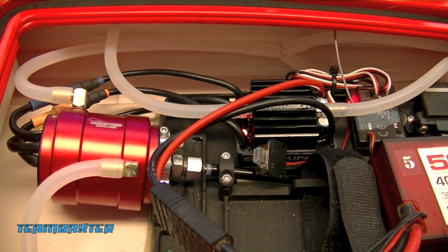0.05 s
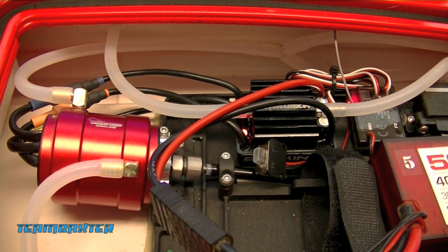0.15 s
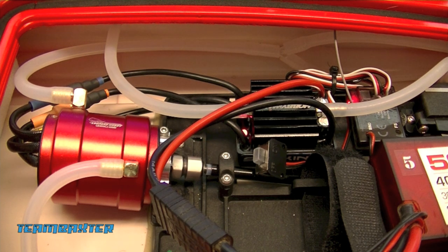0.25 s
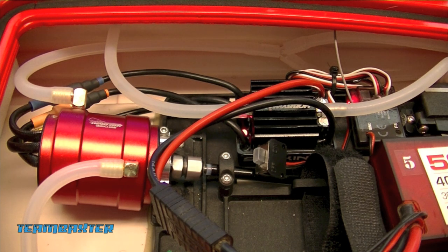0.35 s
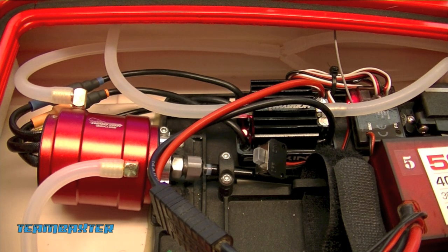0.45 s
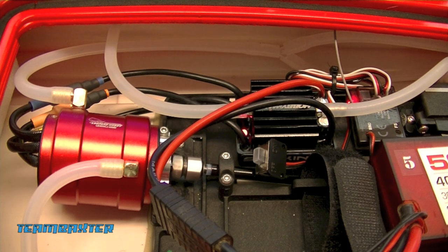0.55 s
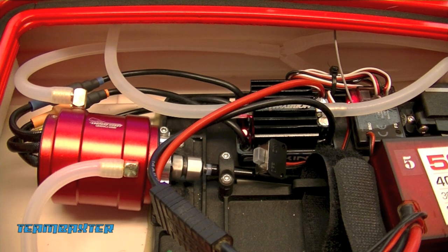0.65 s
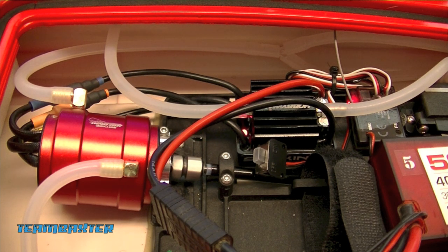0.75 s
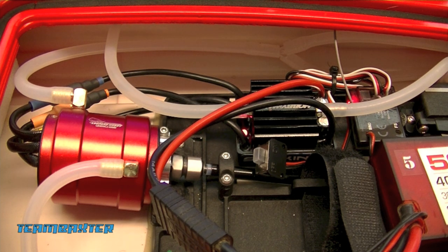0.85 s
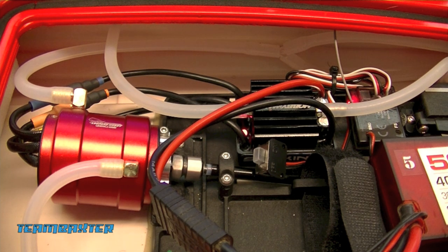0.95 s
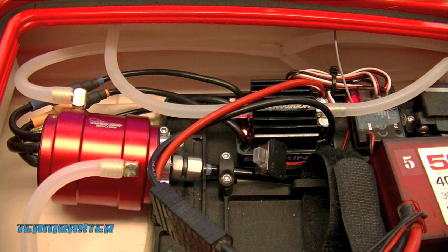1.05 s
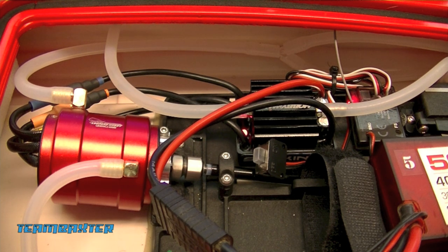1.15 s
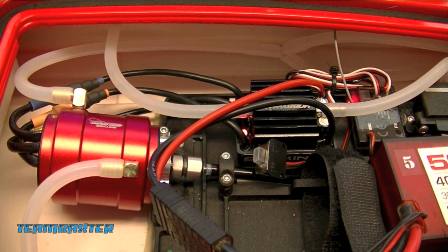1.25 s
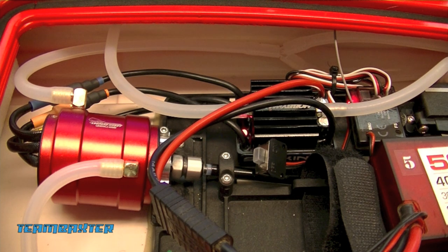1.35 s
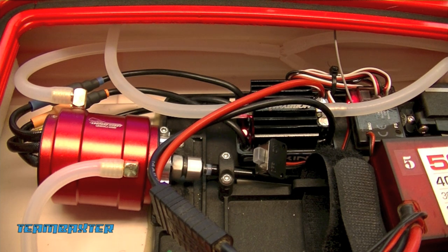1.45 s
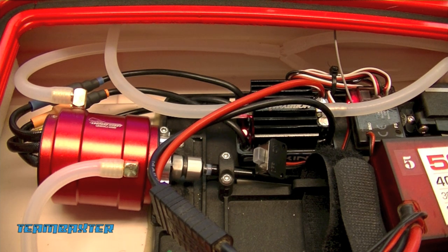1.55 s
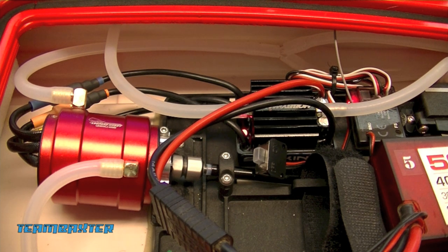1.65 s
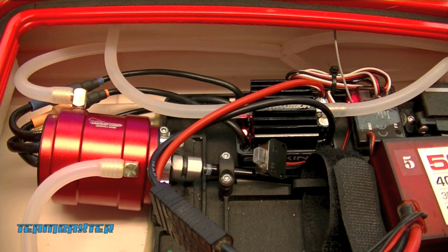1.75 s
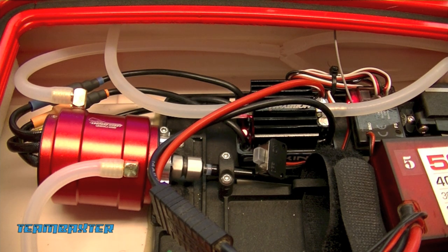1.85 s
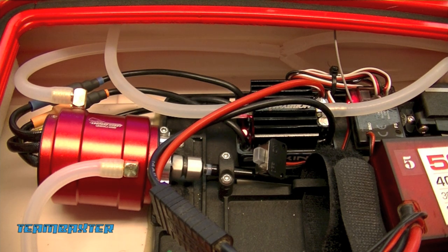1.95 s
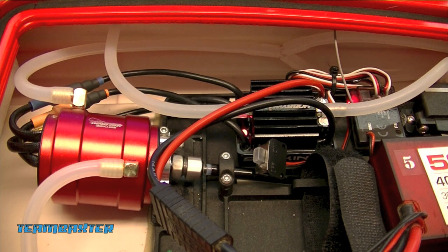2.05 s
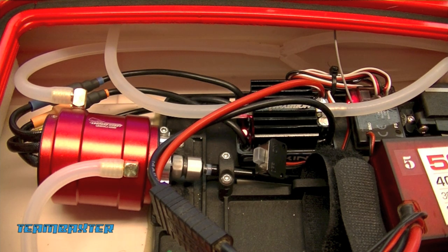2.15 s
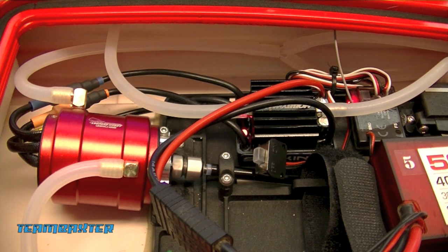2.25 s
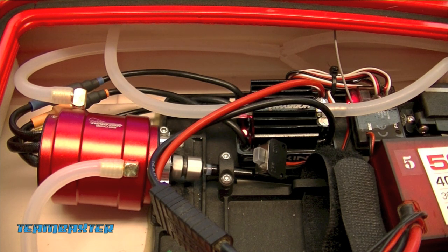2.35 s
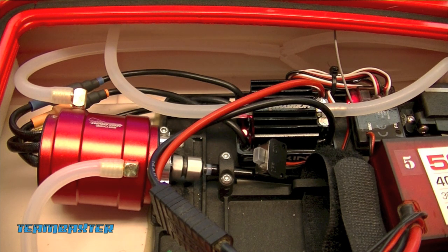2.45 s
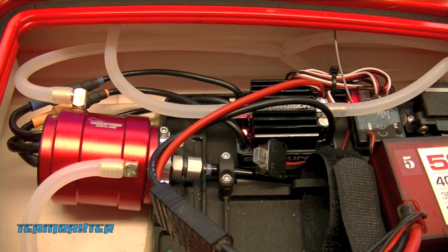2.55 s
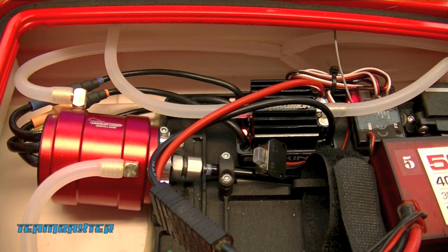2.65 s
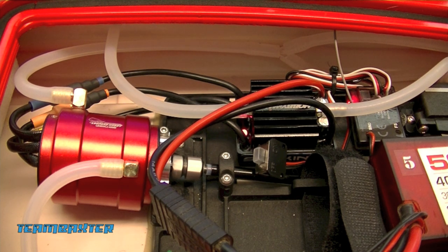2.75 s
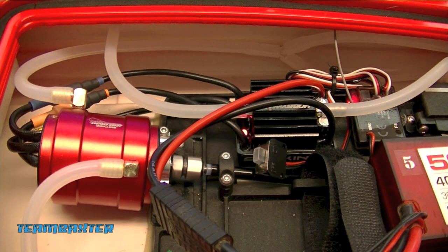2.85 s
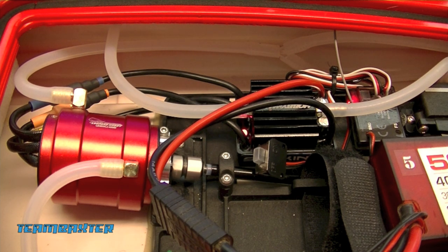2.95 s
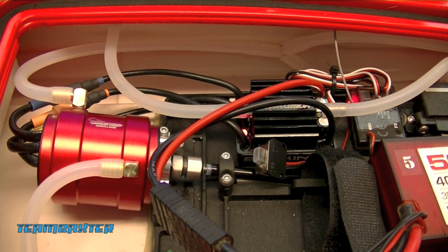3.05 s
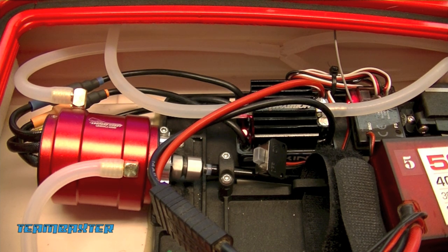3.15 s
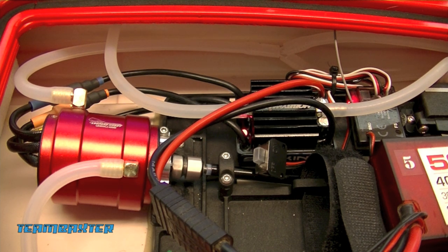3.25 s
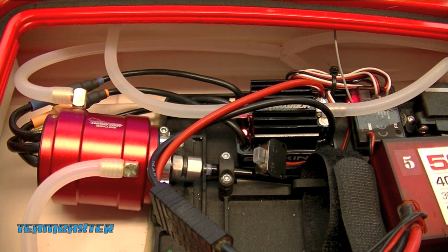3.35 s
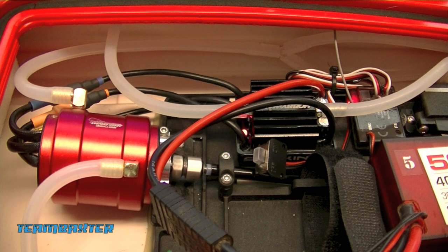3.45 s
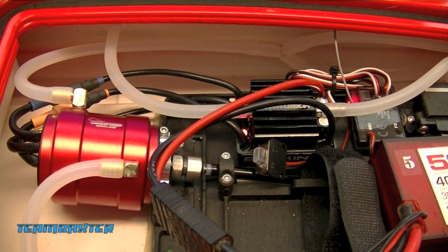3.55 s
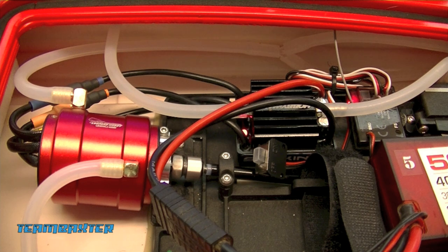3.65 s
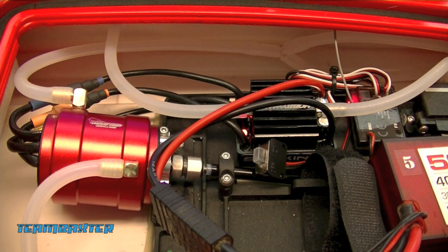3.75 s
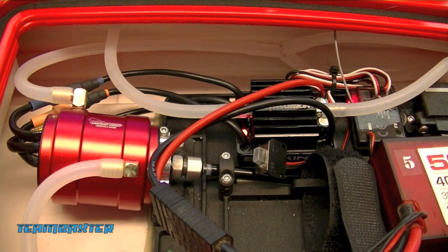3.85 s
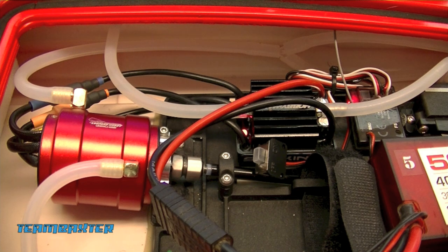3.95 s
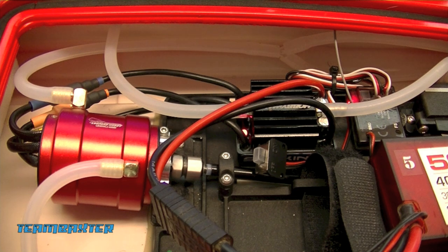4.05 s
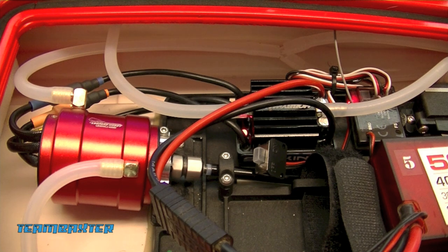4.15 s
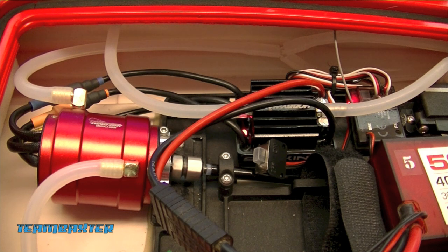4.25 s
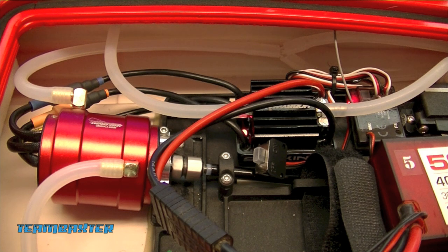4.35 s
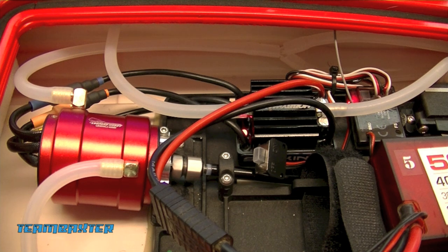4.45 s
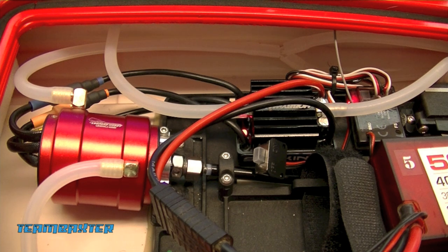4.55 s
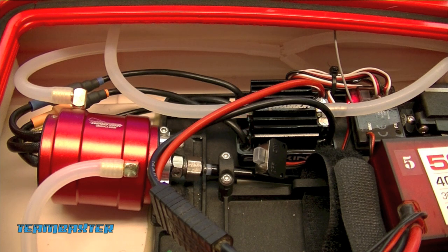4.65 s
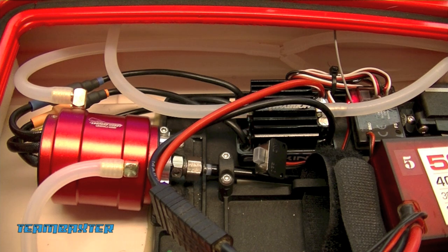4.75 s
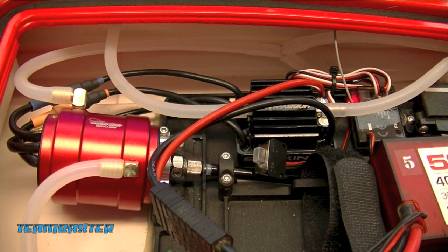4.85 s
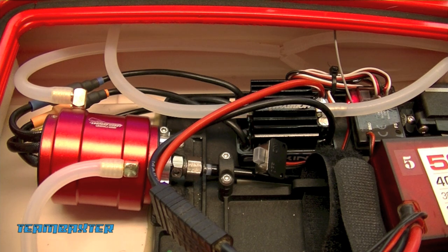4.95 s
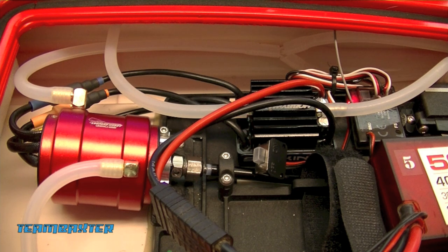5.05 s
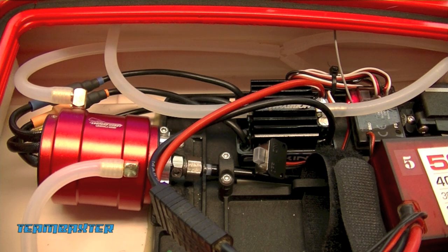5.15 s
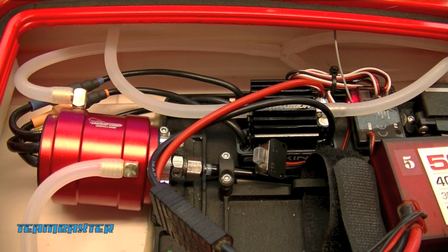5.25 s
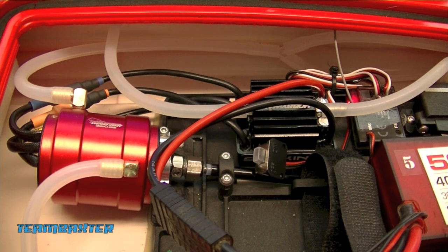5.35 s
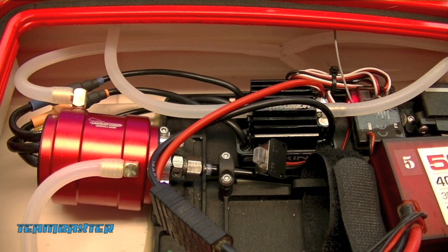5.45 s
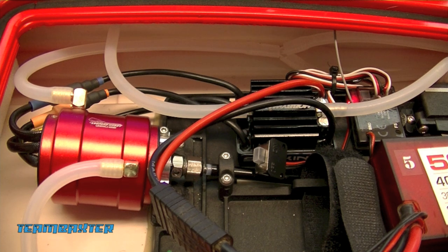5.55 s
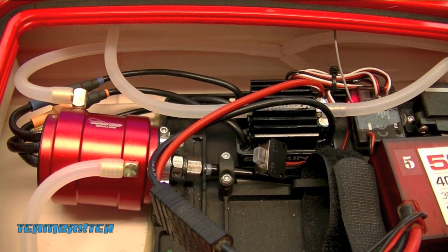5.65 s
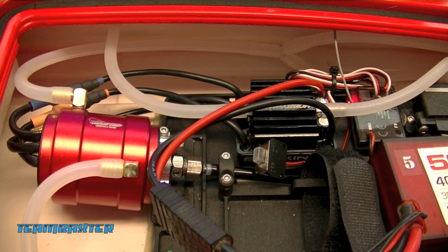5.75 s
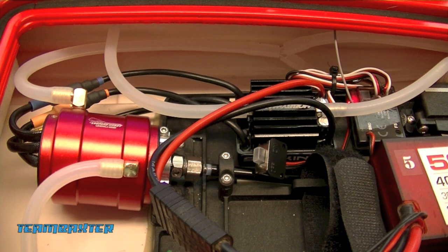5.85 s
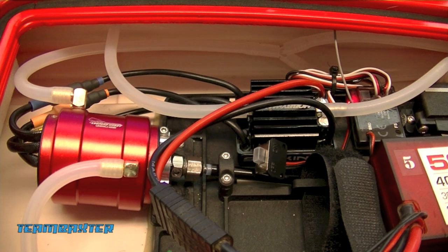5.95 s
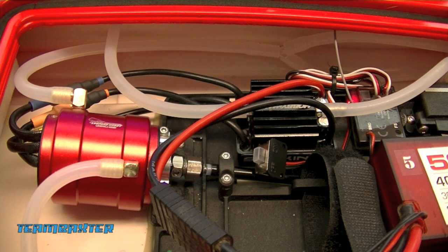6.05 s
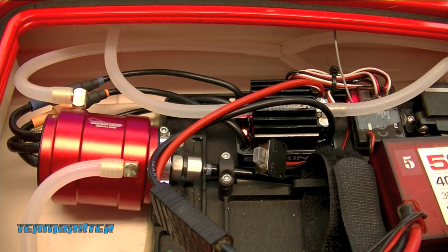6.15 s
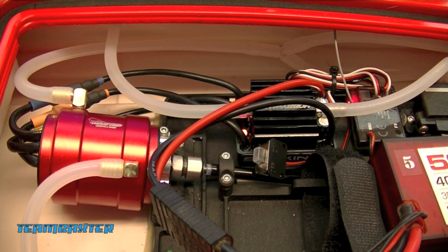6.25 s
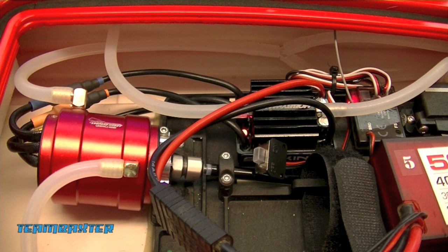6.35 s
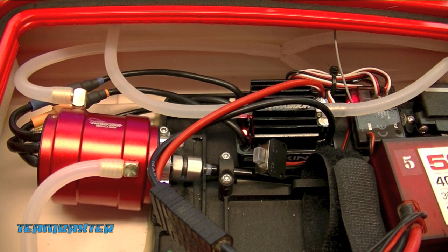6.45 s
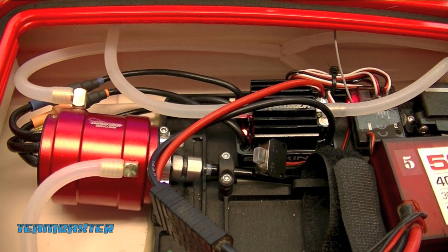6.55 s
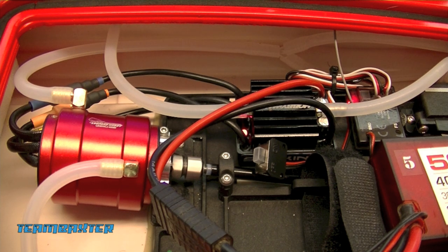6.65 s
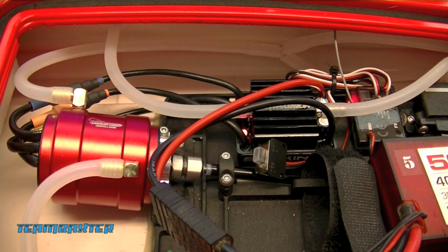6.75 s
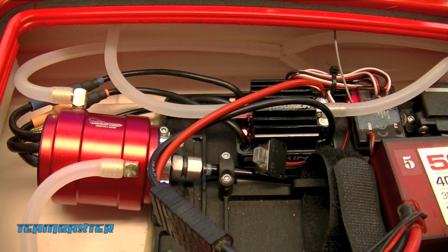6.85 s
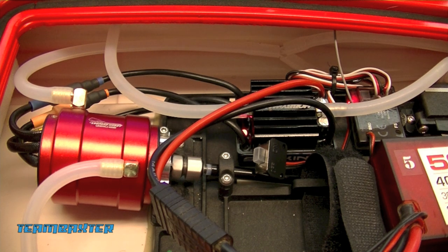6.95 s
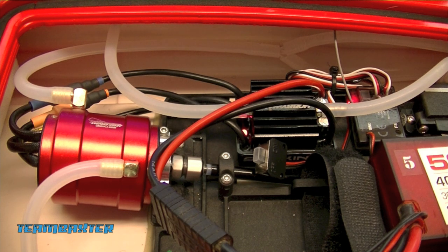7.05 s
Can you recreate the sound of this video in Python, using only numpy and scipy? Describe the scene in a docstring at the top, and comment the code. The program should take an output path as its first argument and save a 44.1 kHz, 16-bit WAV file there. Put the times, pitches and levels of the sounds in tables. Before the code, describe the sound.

A small electric motor drives a model boat's shaft at low speed, heard close in a room with a faint steady hum. From the start, a thin, very high whine stutters while the loose drive rattles hollowly against the hull. Around 0.7 seconds the motor catches with sharp metallic clacks and a short grind. The clatter continues, and the whine breaks briefly a few more times until 1.5 seconds. At about 2.6 seconds the rattle drops away, leaving the even whine over a low hum, soft bearing rub and rapid light ticking. The motor stops quickly at 4.6 seconds. A light tap comes near 4.9 seconds and a fainter one near 5.3. At about 6.1 seconds the motor restarts with a short burst of extra speed, then keeps whining, rattling and clacking until the end, just after 7 seconds.

```python
"""An 8 kHz whine stutters over a rattling hull: a brushless motor turns a model boat's drive shaft at
light throttle, out of the water, close by. The controller's switching makes the whine; torque steps knock
the loose drive against the hull and the coupling clacks across its play. The motor settles into a
torque-ripple hum with bearing rub and one tick a turn, then stops. Two light taps follow, and it restarts
with a short overshoot. A faint steady hum fills the room."""
import sys
import numpy as np
from scipy import signal
from scipy.fft import rfft, irfft, next_fast_len
from scipy.io import wavfile
from scipy.ndimage import map_coordinates

SR = 44100
rng = np.random.default_rng(int(sys.argv[2]) if len(sys.argv) > 2 else 0)


def generate_wav(signal):
    """Clip the signal to [-1, 1] and save it as 16-bit WAV at the path in sys.argv[1]."""
    frames = np.transpose(np.atleast_2d(signal))
    scaled = np.clip(frames, -1, 1) * 32767
    pcm = np.round(scaled).astype(np.int16)
    wavfile.write(sys.argv[1], SR, pcm)


N = 312757

# throttle: open_s, close_s, tight_spot_s (a moment when the coupling passes it)
RUNS = [(-.1, 4.595, 3.6186), (6.142, 7.2, 6.9675)]
# motor speed: time_s, commutation_hz
SPEED = [(.55, 185), (.7, 212), (1.45, 210), (1.7, 223), (2.42, 230), (2.52, 233), (2.6, 239.5),
         (3.1, 242.3), (4.2, 248.4), (4.6, 250), (4.75, 240), (6.15, 370), (6.25, 340), (6.33, 323),
         (6.355, 241), (6.45, 237), (6.5, 244), (6.62, 239), (6.8, 237.5), (6.86, 251), (7.09, 258)]
# controller loses step and cuts the current: start_s, end_s, depth_db
STUTTERS = [(.009, .029, 22), (.049, .056, 16), (.07, .078, 14.5), (.118, .136, 12.5), (.146, .155, 27),
            (.155, .17, 7.5), (.217, .234, 26.5), (.247, .256, 25.5), (.353, .368, 28), (.376, .402, 16),
            (.416, .425, 21.5), (.47, .489, 14.5), (.501, .506, 17), (.538, .559, 17.5), (.568, .581, 23),
            (.596, .601, 24.5), (1.146, 1.161, 17.5), (1.177, 1.182, 13), (1.307, 1.32, 19.5),
            (1.326, 1.334, 13.5), (1.35, 1.355, 10), (1.455, 1.469, 21.5), (1.48, 1.487, 20)]
# drive floats in its play and falls quiet: start_s, end_s, depth_db
LULLS = [(0.01, 0.034, 14), (0.041, 0.057, 13.5), (0.069, 0.07, 18.5), (0.144, 0.172, 10),
         (0.226, 0.259, 9.5), (0.362, 0.375, 6.5), (0.381, 0.403, 16.5), (0.411, 0.418, 16),
         (0.474, 0.502, 7), (0.547, 0.562, 8), (0.575, 0.583, 14), (0.595, 0.605, 7.5), (1.164, 1.18, 6),
         (1.466, 1.486, 9.5)]
# uneven poles swing the whine: shaft_order, depth
POLE_SWING = [(4, 0.071), (8, 0.09), (10, 0.094), (12, 0.031)]
# rotor tones: shaft_order, relative_db
ROTOR_ORDERS = [(6, -34), (9, -29), (10, -25), (13, -17), (16, -9), (17, -13.5), (18, -8.5), (23, -19),
                (25, -18), (27, -19), (29, -21), (30, -14.5), (32, -19.5), (36, -14.5), (37, -17),
                (39, -21), (48, -16.5), (49, -20), (50, -21.5), (58, -21.5), (60, -23.5)]
# mount resonances: centre_hz, width_hz, lift_db
MOUNT_MODES = [(248.5, 15, 9), (327, 48, 22), (472.2, 19.4, 6.5)]
# hull and, higher up, motor housing resonances: centre_hz, width_hz, lift_db
HULL_MODES = [(117, 19, 10.5), (160, 15, -5.5), (193, 21, 7.5), (205.2, 16, 6), (323.3, 19, 11.5),
              (374.7, 54.6, 10.5), (468.3, 46, 10), (559.7, 35, 8.5), (659, 14, 1.5), (830, 60, 8.5),
              (1066, 85, 8.5), (1198, 24, 5.5), (1430, 140, 9), (1570, 103, 9.5), (1758, 64, 7),
              (1950, 79, 4.5), (2160, 190, 0.5), (2593, 26, 7.5), (2810, 56, 3), (3013, 90, 4.5),
              (3560, 150, 6.5), (3800, 100, 5.5), (4324, 76, 7), (4515, 68, 3), (4810, 80, 5),
              (5390, 95, 5), (5880, 63, 5), (9200, 230, -1)]
# play in the drive train: time_s, rattle_db
RATTLE_LEVEL = [(0, -23), (.55, -23.5), (.9, -27.5), (1.25, -21.5), (1.6, -28), (2.4, -29), (2.45, -34),
                (2.51, -29.5), (2.63, -50.5), (3.7, -49.5), (4.6, -43), (6.24, -28), (6.32, -35.5),
                (6.37, -27.5), (6.45, -27), (6.52, -33), (6.62, -27.5), (6.79, -26), (6.85, -37),
                (7.09, -34.5)]
# shaft rasps in its bearing: middle_s, length_s, lift_db
RASPS = [(2.505, 0.029, 8), (3.414, 0.034, 4), (4.595, 0.0098, 4.5)]
# steady room hum: pitch_hz, level_db
ROOM_TONES = [(172.3, -60), (290.7, -58.5), (409.1, -52.5), (468.3, -67.5), (527.6, -63.5), (995.9, -67.5),
              (1055, -69), (1696, -70), (1992, -77), (2116, -76.5), (3149, -73.5), (4506, -72.5),
              (4678, -75), (5033, -82.5)]
# hard snaps of the coupling: time_s, clack_relative_db, thump_relative_db
HARD_SNAPS = [(.06, -25, -11.5), (.082, -21, -7.5), (.251, -19, -9.5), (.335, -17.5, -17), (.424, -38, -10),
              (.621, -24, -7.5), (.667, -3.5, -24), (.677, -9.5, -12), (.711, -4.5, -9), (.726, -12, -6.5),
              (.775, -20, -23), (.784, -10.5, -24), (.833, -21, -32), (.866, -14, -26), (.884, -15, -13),
              (.902, -25, -11.5), (.929, -21, -13), (.984, -14, -26), (1.057, -13, -10),
              (1.145, -17.5, -22), (1.219, -15, -10), (1.314, -25, -9.5), (1.355, -28, -2.5),
              (1.364, -17.5, -21), (1.409, -21.5, -18), (1.449, -18.5, -15), (1.459, -32, -4),
              (1.536, -19, -17), (1.564, -18, -8.5), (1.584, -33, -14), (1.623, -34, -24),
              (1.666, -24, -12), (1.704, -28, -13), (1.733, -27, -13), (1.761, -31, -13.5),
              (1.787, -33, -11.5), (1.814, -41, -18), (1.86, -28, -12), (1.886, -25, -12),
              (1.926, -28, -19), (1.951, -34, -10), (1.977, -31, -11), (2.003, -24, -19),
              (2.048, -26.5, -12.5), (2.101, -25, -13.5), (2.137, -23.5, -11.5), (2.162, -28, -12),
              (2.216, -20.5, -13.5), (2.247, -32, -13), (2.271, -22.5, -15), (2.298, -25.5, -10),
              (2.354, -24, -22), (2.378, -22.5, -16), (2.404, -21, -14.5), (2.477, -21.5, -27),
              (2.63, -28, -33), (3.422, -26.5, -30), (4.597, -31, -15), (6.148, -32, -22),
              (6.197, -29, -18), (6.235, -17, -18), (6.264, -15, -35), (6.3, -17, -35), (6.345, -22, -21),
              (6.374, -28.5, -11.5), (6.422, -27, -13), (6.44, -16.5, -11.5), (6.525, -19, -22),
              (6.541, -19, -31), (6.572, -19, -28), (6.592, -25, -11), (6.647, -24, -12.5),
              (6.675, -25, -15), (6.691, -19, -29), (6.722, -18.5, -22), (6.751, -20, -15),
              (6.792, -24, -16), (6.825, -16, -18), (6.868, -18.5, -31), (6.968, -13, -37),
              (7.063, -14.5, -18)]
# once-a-turn tick: time_s, relative_db
TICK_LEVEL = [(.75, -36), (2.4, -46.5), (2.6, -40), (2.95, -44.5), (3.3, -39), (4.1, -34), (4.6, -33.5),
              (6.2, -38.5), (6.78, -40.5), (6.9, -33.5), (7.09, -32.5)]
# coupling contacts in each turn: angle_turns, relative_db, loose_change_db
CONTACTS = [(0, 2, -6.5), (.09, -10.5, -5), (.35, -14, 10), (.68, -18, 8)]
# taps while the motor rests: time_s, knock_db, click_db
TAPS = [(4.949, -45, -42.5), (5.25, -51, -66)]

# spectral outline of each sound: frequency_hz, relative_db
SWITCHING_EQ = [(4000, -50.5), (7400, -5), (8000, 0.5), (8700, -26.5), (10000, -47.5), (12000, -26),
                (13500, 9), (15800, 6)]
SIZZLE_EQ = [(2000, -35.0), (6000, 1.5), (15800, -10.5)]
KNOCK_EQ = [(30, -53), (85, -46.5), (130, -23.5), (180, -11.5), (290, -3), (400, 0.5), (520, -5.5),
            (720, -15.5), (950, -10), (1300, -18.5), (2100, -24.5), (3000, -30), (4100, -47.5),
            (6300, -44.5), (10000, -74)]
GRIT_EQ = [(30, -59), (300, -18), (700, 9.5), (1400, 4), (2000, 2.5), (2700, -4), (4200, -13), (6300, -12),
           (9500, -47.5)]
RUB_EQ = [(30, -46), (70, -29.5), (120, -16), (200, -8.5), (370, -7.5), (500, 3.5), (620, 5.5), (850, -7),
          (1200, -6), (1500, -13), (2100, -11), (3000, -16), (4000, -23), (6300, -23), (10000, -74.5)]
ROOM_EQ = [(25, -32), (60, -24), (110, -11), (170, -1.5), (230, -4), (330, -9), (420, -7), (620, -21),
           (1000, -22), (2500, -25), (3050, -23), (3400, -29), (4300, -31), (4620, -23), (4900, -31),
           (7200, -32), (11000, -37), (15800, -46)]
RUMBLE_EQ = [(30, -8.5), (300, 2.5), (1500, -2), (15000, -22.0)]
CLACK_EQ = [(30, -67), (150, -25.5), (600, 7), (1300, -0.5), (2000, 9.5), (2900, 3), (4200, -9.5),
            (6300, -9), (9500, -39), (12000, -56.5)]
TICK_EQ = [(30, -51.5), (150, -28), (600, -3), (1300, -0.5), (2000, 7), (2900, 4), (4200, -6), (6300, -11),
           (9500, -48.5), (12000, -44)]
TAP_KNOCK_EQ = [(300, -36), (600, -3.5), (730, -1), (900, -16), (2000, -38.5)]
TAP_CLICK_EQ = [(1200, -25), (1900, 5), (2600, -2), (3500, -10), (6000, -19), (10000, -44.5)]

STEPS_PER_TURN, CRUISE_HZ = 12, 245  # commutations
SWITCHING_HZ, TOP_HZ = 8034, 15850
SPIN_LAG_S, SPIN_ATTACK_S = 0.027, 0.03  # rotor starts just after the current
COAST_DB_PER_S, RIPPLE_COAST_DB_PER_S = 348, 144
CATCH_S, CATCH_DB, CATCH_DECAY_S = 0.68, 9, 0.3  # rotor catches; shaft grinds until it settles


def amp(db):
    """Decibels to gain."""
    return 10 ** (np.asarray(db) / 20)


def unit(x):
    """Scale to rms 1."""
    return x / np.sqrt(np.mean(x ** 2) + 1e-20)


def clock():
    """Seconds at each sample."""
    return np.arange(N) / SR


def noise():
    """White noise, rms 1."""
    return rng.standard_normal(N)


def curve(rows):
    """Interpolate (time_s, value) rows at each sample."""
    return np.interp(clock(), *np.transpose(rows))


def wobble(rate_hz):
    """Smooth random curve, rate_hz knots a second."""
    return map_coordinates(rng.standard_normal(int(N * rate_hz / SR) + 4), [clock() * rate_hz])


def bell(x, centre, width):
    """Bump of height 1; width at half height."""
    return 2 ** -np.minimum((2 * (x - centre) / width) ** 2, 20)


def lift_db(x, bumps):
    """Sum of (centre, width, lift_db) bumps at x."""
    return sum(db * bell(x, centre, width) for centre, width, db in bumps)


def dips(rows, edge_s=0.008):
    """Gain with flat-bottomed dips."""
    t = clock()
    return amp(-sum(db * np.clip(np.minimum(t - start, end - t) / edge_s + .5, 0, 1)
                    for start, end, db in rows))


def filtered(x, response):
    """Apply a complex frequency response."""
    size = next_fast_len(N + SR // 2)
    return irfft(rfft(x, size) * response(np.fft.rfftfreq(size, 1 / SR)), size)[..., :N]


def coloured(x, outline, modes=()):
    """Minimum-phase filter of unit energy: an outline, lifted around each resonance."""
    size = 16384
    hz = np.fft.rfftfreq(size, 1 / SR)
    knot_hz, knot_db = np.transpose(outline)
    gain_db = np.interp(np.log(hz + 1), np.log(knot_hz), knot_db) + lift_db(hz, modes)
    cepstrum = irfft(np.log(amp(gain_db)))
    causal_fold = np.r_[1, np.full(size // 2 - 1, 2), 1, np.zeros(size // 2 - 1)]
    kernel = irfft(np.exp(rfft(cepstrum * causal_fold)))
    return signal.fftconvolve(x, kernel / np.linalg.norm(kernel))[:N]


def impulses(times_s, sizes):
    """Impulse train."""
    return np.bincount(np.clip(np.round(times_s * SR).astype(int), 0, N), sizes, N + 1)[:N]


def random_times(rate_hz):
    """Random times in seconds at a varying rate."""
    position, luck = rng.random(size=(400, 2)).T
    at = (position * N).astype(int)
    return at[luck < rate_hz[at] * N / SR / len(at)] / SR


def running(lag_s=SPIN_LAG_S, attack_s=SPIN_ATTACK_S, release_db_per_s=COAST_DB_PER_S):
    """Gain that rises after the throttle opens and decays when it closes."""
    t = clock()
    return sum(np.clip((t - on - lag_s) / attack_s, 0, 1) * amp(-release_db_per_s * np.maximum(t - off, 0))
               for on, off, _ in RUNS)


def shaft_turns(speed_hz):
    """Shaft angle, counted in each run from the coupling's tight spot."""
    open_s, _, tight_s = np.transpose(RUNS)
    turns = np.cumsum(speed_hz) / SR / STEPS_PER_TURN
    run = np.searchsorted(open_s, clock()) - 1
    return turns - np.interp(tight_s, clock(), turns)[run]


def shaft_tone(turns, order):
    """Sine at a multiple of the shaft rate, random phase."""
    return np.sin(2 * np.pi * (order * turns + rng.random()))


def roughness(turns, fresh):
    """Surface texture that repeats every turn, plus fresh noise."""
    size = 2048
    ring = irfft(np.exp(2j * np.pi * rng.random(size // 2 + 1)))
    repeating = map_coordinates(ring, [turns % 1 * size], mode="grid-wrap")
    return unit(unit(repeating) + fresh * noise())


def whine(turns, speed_hz, unrest, torque, current):
    """Switched current sings in the windings; flutters and hisses when the rotor runs unevenly."""
    gate = running(lag_s=0, attack_s=0.063, release_db_per_s=432)
    level_db = -27.5 + 5 * np.log2(speed_hz / CRUISE_HZ)
    swing = sum(depth * shaft_tone(turns, order) for order, depth in POLE_SWING)
    flutter = unrest * (0.3 * wobble(480) + 0.14 * wobble(32))
    carrier = np.sin(2 * np.pi * SWITCHING_HZ * clock() + 0.27 * unrest * wobble(540))
    tone = np.sqrt(2) * current * (1 + swing + flutter) * carrier
    hiss = torque * (amp(-37.5) + amp(-29) * unrest) * coloured(noise(), SWITCHING_EQ)
    # out of step, the switching spreads into a broad sizzle
    sizzle = amp(-20) * torque * (1 - current) * coloured(noise(), SIZZLE_EQ)
    return amp(level_db) * gate * (tone + hiss + sizzle)


def rattle(turns, rattle_db, grit_db=-12.5, grit_t60_s=0.016):
    """Torque steps knock the loose drive on the hull, hardest twice a turn, with a gritty metal edge."""
    at = np.flatnonzero(np.diff(np.floor(turns * STEPS_PER_TURN)) > 0)
    jitter, spread, polarity = rng.standard_normal((len(at), 3)).T
    force_db = 1.4 * spread + 1.9 * np.cos(2 * np.pi * 2 * turns[at])
    knocks = impulses(at / SR + .0004 * jitter, np.sign(polarity + .3) * amp(force_db))
    fade = amp(-60 * np.arange(SR // 20) / SR / grit_t60_s)
    scrape = signal.fftconvolve(np.abs(knocks), fade)[:N] * noise()
    body = unit(coloured(unit(knocks) + 0.55 * unit(scrape), KNOCK_EQ, HULL_MODES))
    grit = unit(coloured(scrape, GRIT_EQ, HULL_MODES))
    return (body + amp(grit_db) * grit) * amp(rattle_db)


def hum(turns, speed_hz, unrest, firm_range_hz=3):
    """Torque ripple and its octave swell on the mount's resonances; a loose drive favours the octave."""
    loose = np.minimum(unrest, 1)
    turns = turns + 0.0025 * loose * wobble(110)
    ripple_db = -39.5 + lift_db(speed_hz, MOUNT_MODES) - 4.5 * loose
    octave_db = -39.5 + lift_db(2 * speed_hz, MOUNT_MODES) * (1 + 1.6 * loose)
    ripple = amp(ripple_db) * shaft_tone(turns, STEPS_PER_TURN)
    octave = amp(octave_db) * shaft_tone(turns, 2 * STEPS_PER_TURN)
    # above cruise the shaft bears harder on its coupling
    firmness = np.clip((speed_hz - CRUISE_HZ) / firm_range_hz, -1, 1)
    orders = sum(amp(db + 1.3 * wobble(9)) * shaft_tone(turns, order) for order, db in ROTOR_ORDERS)
    orders *= amp(-35.5 + 2.5 * firmness - 9.5 * loose)
    ripple_gate = running(release_db_per_s=RIPPLE_COAST_DB_PER_S)
    return np.sqrt(2) * (ripple * ripple_gate + (octave + orders) * running())


def bearings(turns, speed_hz, unrest):
    """Bearings rub the same roughness every turn; unrest blurs and pulses it; the shaft rasps at times."""
    t, loose = clock(), np.minimum(unrest, 1)
    grind_db = CATCH_DB * (t > CATCH_S) * np.exp(-np.abs(t - CATCH_S) / CATCH_DECAY_S)
    rub_db = -31 + 6.5 * np.log2(speed_hz / CRUISE_HZ) + grind_db + lift_db(t, RASPS) - 4.5 * loose
    pressure = 1 + (0.058 + .5 * loose) * np.sin(2 * np.pi * STEPS_PER_TURN * turns)
    friction = pressure * roughness(turns, fresh=0.43 + 1.64 * unrest)
    return amp(rub_db) * unit(coloured(friction, RUB_EQ, HULL_MODES))


def room():
    """Steady hum and soft noise; a trace of rumble differs between the channels."""
    tones = sum(amp(db + 0.9 * wobble(4)) * np.sin(2 * np.pi * (hz * clock() + rng.random()))
                for hz, db in ROOM_TONES)
    air = amp(-50) * coloured(noise(), ROOM_EQ)
    rumble = amp(-65) * coloured(noise(), RUMBLE_EQ)
    return np.sqrt(2) * tones + air + np.array([rumble, -rumble])


def metal_contacts(times_s, sizes, grain, outline, crack_t60_s, tail_t60_s, tail_db):
    """Each contact cracks, then scatters briefly inside the hull."""
    t = np.arange(SR // 4) / SR
    fade = amp(-60 * t / crack_t60_s) + amp(tail_db - 60 * t / tail_t60_s)
    envelope = signal.fftconvolve(impulses(times_s, sizes), fade)[:N]
    return coloured(envelope * np.sign(grain), outline, HULL_MODES)


def clacks(unrest, light_rate_hz=45):
    """The coupling snaps across its play: bright metal over a hull thump."""
    light_s = random_times(light_rate_hz * np.minimum(unrest, 1))
    force_db = 20 * np.log10(unrest[(light_s * SR).astype(int)] + 1e-6)
    force_db -= 1.5 * rng.standard_normal(len(light_s))
    light_snaps = np.c_[light_s, force_db - 28, force_db - 27.5]
    jerks = [(end_s, -42.5, -21.5) for _, end_s, _ in LULLS]  # drive bites after each lull
    times_s, clack_db, thump_db = np.vstack([HARD_SNAPS, jerks, light_snaps]).T
    metal = metal_contacts(times_s, amp(clack_db - 8.5), noise(), CLACK_EQ,
                           crack_t60_s=0.0074, tail_t60_s=0.056, tail_db=-4)
    thump = coloured(impulses(times_s, amp(thump_db + 14.5)), KNOCK_EQ, HULL_MODES)
    return metal + thump


def ticks(turns, unrest, fully_loose_unrest=.25):
    """The coupling ticks at its tight spot; running loose, it also clatters between the beats."""
    tick_db = curve(TICK_LEVEL) + 9
    loose = np.minimum(unrest / fully_loose_unrest, 1)
    driven = (clock() > CATCH_S) & (running(lag_s=0) > .5)
    times_s, sizes = [], []
    for angle_turns, db, loose_db in CONTACTS:
        at = np.flatnonzero((np.diff(np.floor(turns - angle_turns)) > 0) & driven[1:])
        jitter, spread = rng.standard_normal((len(at), 2)).T
        times_s.append(at / SR + 0.001 * loose[at] * jitter)
        sizes.append(amp(tick_db[at] + db + loose_db * loose[at] + (.5 + loose[at]) * spread))
    times_s, sizes = np.concatenate(times_s), np.concatenate(sizes)
    metal = metal_contacts(times_s, sizes, roughness(turns, fresh=.9), TICK_EQ,
                           crack_t60_s=0.0095, tail_t60_s=0.065, tail_db=-10)
    thump = coloured(impulses(times_s, amp(4) * sizes), KNOCK_EQ, HULL_MODES)
    return metal + thump


def taps(t60_s=0.092):
    """Light taps on the boat: a hollow knock with a small click on top."""
    times_s, knock_db, click_db = np.transpose(TAPS)
    fade = amp(-60 * np.arange(SR // 4) / SR / t60_s)
    burst = lambda db: signal.fftconvolve(impulses(times_s, amp(db)), fade)[:N] * noise()
    return coloured(burst(knock_db), TAP_KNOCK_EQ) + coloured(burst(click_db), TAP_CLICK_EQ)


def stereo_side(hz, delay_s=.0008):
    """Faint width: the treble differs slightly in phase between channels, plus a very quiet delayed copy."""
    treble_width = amp(-26) * 1j * hz / (hz + 2200)
    delayed_copy = amp(-45) * np.exp(-2j * np.pi * hz * delay_s)
    return treble_width + delayed_copy


def scene():
    """Speed and looseness drive all moving parts; stutters chop the whine, lulls the mechanical noise."""
    speed_hz, rattle_db = curve(SPEED), curve(RATTLE_LEVEL)
    unrest = amp(rattle_db + 22)  # near 0 in smooth running, about 1 in a full rattle
    rotor_turns = shaft_turns(speed_hz)
    turns = rotor_turns + .012 * unrest * wobble(14)  # rattling shaft hunts around the rotor
    spinning = running()
    current, contact = dips(STUTTERS), dips(LULLS)
    torque = amp(np.minimum(unrest, 1)) * contact  # up to 1 dB more when loose
    drive = hum(rotor_turns, speed_hz, unrest)
    drive += spinning * (bearings(turns, speed_hz, unrest) + ticks(turns, unrest) + rattle(turns, rattle_db))
    motor = whine(turns, speed_hz, unrest, torque, current) + torque * drive
    motor += clacks(spinning * unrest * contact ** 2)
    side = filtered(motor, stereo_side)
    return motor + np.array([side, -side]) + taps() + room()


def record(dry):
    """Brick-wall low-pass at TOP_HZ."""
    return filtered(dry, lambda hz: hz < TOP_HZ)


dry = scene()
out = record(dry)
generate_wav(out)
```